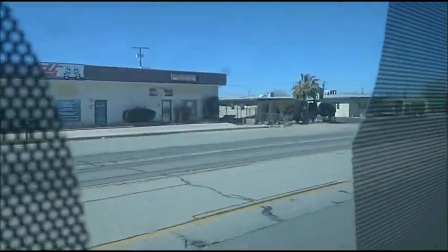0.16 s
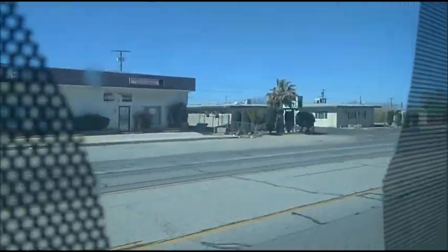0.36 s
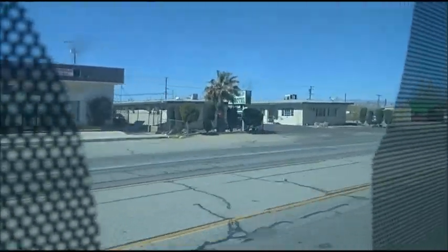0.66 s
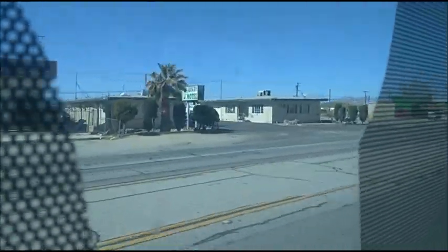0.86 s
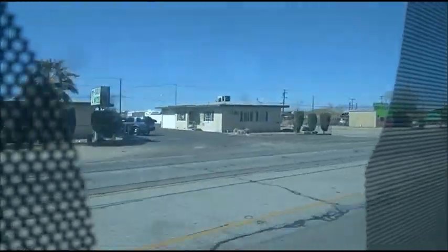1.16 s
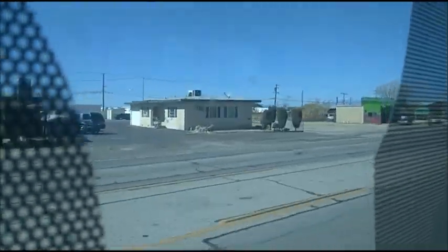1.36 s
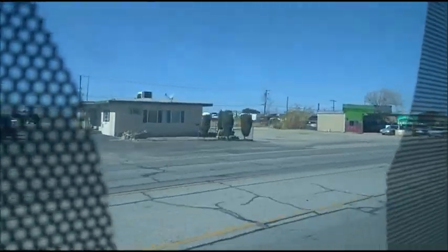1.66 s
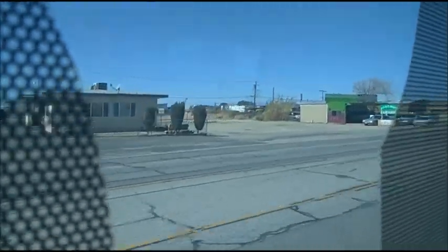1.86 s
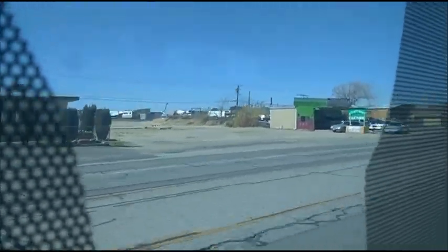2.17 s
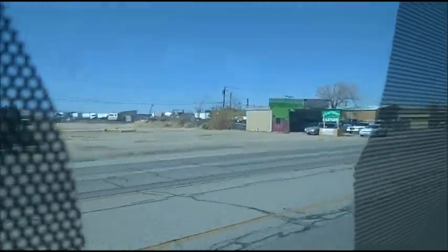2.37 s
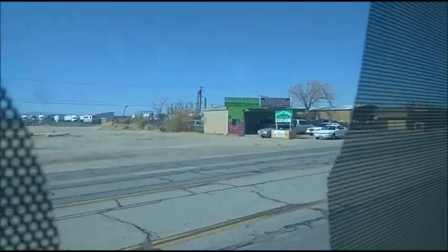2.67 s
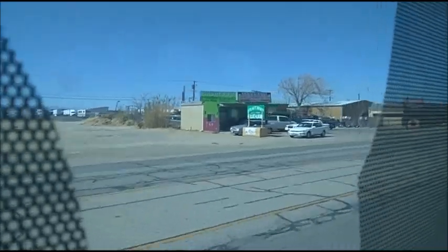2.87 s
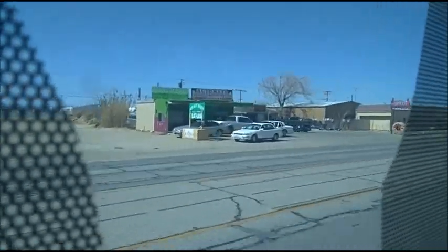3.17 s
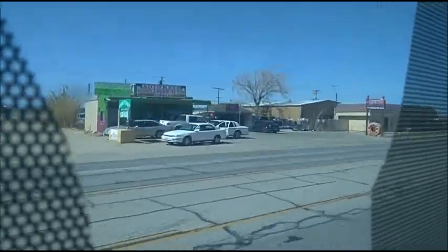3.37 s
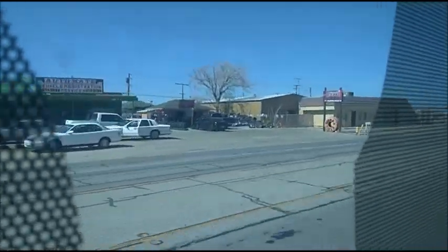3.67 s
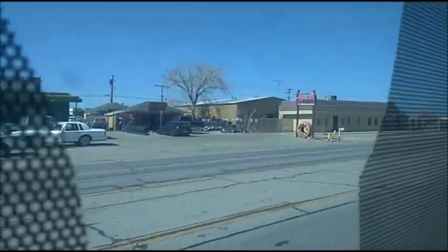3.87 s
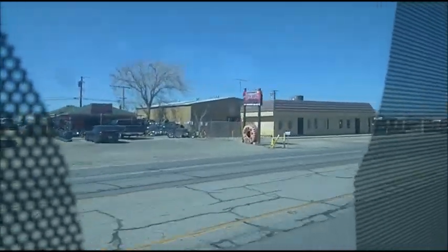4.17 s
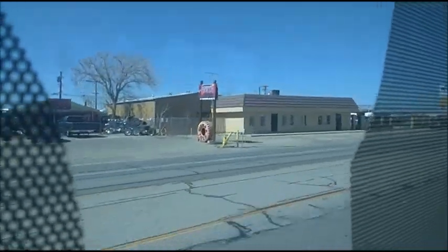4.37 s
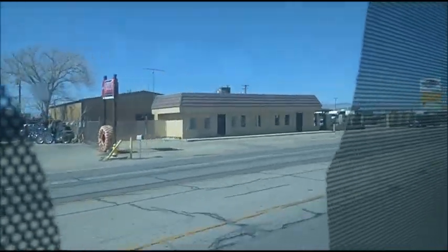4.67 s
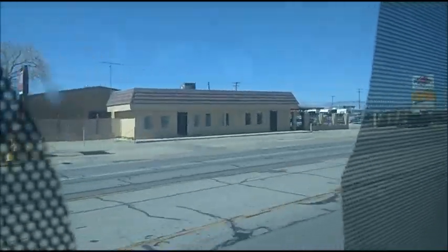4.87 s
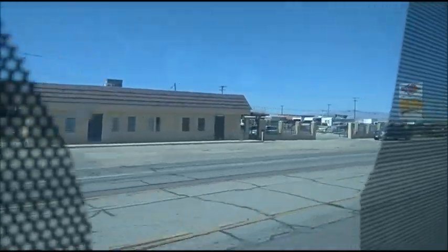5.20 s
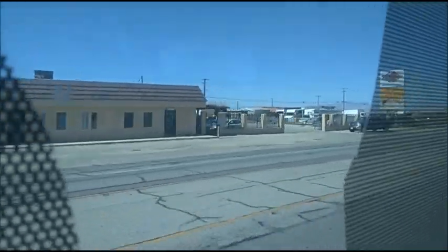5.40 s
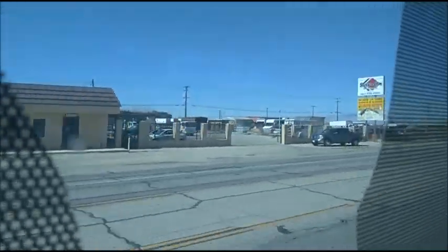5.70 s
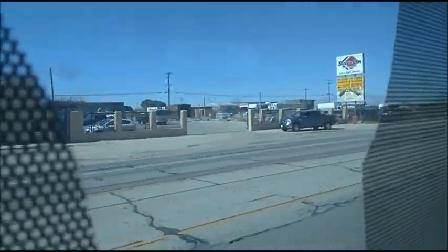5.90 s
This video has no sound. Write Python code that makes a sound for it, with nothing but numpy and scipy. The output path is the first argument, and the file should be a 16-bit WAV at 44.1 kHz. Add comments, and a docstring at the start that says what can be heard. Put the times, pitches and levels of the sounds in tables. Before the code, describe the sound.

The interior of an electric bus cruising along a cracked street for about six seconds, heard in stereo from close beside a side window. Continuous deep road boom and duller tyre roar dominate, fluttering gently, with little treble. Soft low thumps arrive irregularly, around five or six each second, as wheels cross cracks; heavier ones fall near 1.6, 2.1 and 3.9 seconds. A steady mid-pitched gear tone and fainter high motor whines rise very slightly throughout, wavering and swelling, the motor clearer near 1.5 and 5.25. A sharp plastic snap comes at 0.14. Tiny gritty trim creaks scatter along the left side, clearer around 3.9 and 4.4. A loose panel fizzes thinly from about 4.65 to 5. Another snap strikes at 5.66, then a quick double near 5.88 and a weaker one at 5.96, with the ride still rolling on.

```python
"""Inside an electric bus that cruises along a cracked street and gains a little speed, for about six seconds.
Throughout, coloured noise makes the road's boom and tyre roar, and short low tones thump at each crack.
Sine tones of gears and motor whine and slowly rise; gritty noise bursts make the trim creak.
A plastic panel snaps near the start, a loose one fizzes briefly after 4.6 s, and more snaps come near the end.
Two closely spaced microphones by a side window hear it all in stereo."""
import sys
import numpy as np
from scipy import signal
from scipy.fft import rfft, irfft
from scipy.io import wavfile
from scipy.ndimage import uniform_filter1d

SR = 44100
rng = np.random.default_rng(int(sys.argv[2]) if len(sys.argv) > 2 else 0)


def to_wav(s):
    """Save 16-bit WAV."""
    ch = np.atleast_2d(s).T  # columns
    pcm = np.round(np.clip(ch, -1, 1) * 32767)  # PCM
    wavfile.write(sys.argv[1], SR, pcm.astype(np.int16))


N = 266452  # length in samples

# Speed of the drive, as the pitch that all its tones are multiples of.
# Each row: time in seconds, pitch in Hz.
DRIVE_SPEED = [(0, 653.9), (1, 665), (2, 668.3), (3, 677.9), (4, 682.3), (5, 692.2), (6.04, 698.3)]
# Level of the treble, where the trim sizzles.
# Each row: time in seconds, relative level in dB.
TREBLE_LEVEL = [(0, -45), (.22, -53), (.62, -47.5), (.76, -52.5), (1.15, -50), (1.58, -50), (1.72, -54.5),
                (2.35, -53.5), (2.52, -51), (3.9, -50.5), (4.1, -53.5), (4.44, -49.5), (4.86, -44.5),
                (5.03, -49.5), (5.18, -54.5), (5.28, -49), (5.7, -49.5), (6.04, -47.5)]
# The wheels cross cracks in the road.
# Each row: middle in seconds, length in seconds, relative level of the body boom in dB, its pitch in Hz,
# relative level of the panel drone in dB, its pitch in Hz.
ROAD_CRACKS = [(0.128, 0.089, 10, 75, 5, 150.7), (.293, 0.12, 6, 68.1, 1, 123.3),
               (0.474, 0.049, 8, 68.1, -6, 121), (0.542, 0.044, 6.5, 68, -12, 122),
               (0.68, .058, 9.5, 67.8, 6.5, 201.8), (0.84, 0.054, 4, 67, 1.5, 194),
               (1.083, 0.044, 6, 63, 6, 154.9), (1.26, 0.065, 7, 70.24, 6, 160),
               (1.536, .05, 5.5, 70, 3, 156), (1.62, 0.06, 12.5, 69.6, 0, 149.5),
               (1.944, 0.044, -4, 67.35, 3, 204), (2.102, .05, 15, 68.04, 3.5, 196.4),
               (2.26, 0.042, 9.5, 68.8, -7, 197), (2.44, 0.075, 5, 73, -3, 201.6),
               (2.6, 0.049, 10.5, 68, 4, 214), (2.846, 0.038, 12, 82.3, 2.5, 121.2),
               (2.96, 0.07, 6.5, 72.2, 3, 106), (3.042, 0.047, 8.5, 66, 6.5, 199),
               (3.214, 0.05, 9.5, 68, 4.5, 122.8), (3.372, 0.062, 8.5, 69.9, -14, 228),
               (3.523, 0.037, 9, 77.4, 5, 145.3), (3.652, 0.051, 11, 73.1, 6.5, 198.6),
               (3.917, 0.05, 14.5, 70.86, 7.5, 105), (4.135, .037, 6.5, 67.3, -16, 190),
               (4.256, 0.063, 8, 72, 3, 150), (4.562, 0.049, 10, 65, -0.5, 197.8),
               (4.748, 0.079, 7.5, 72.9, 3, 148), (4.89, 0.044, 8, 65, 4, 161.3),
               (5.052, 0.1, 7.5, 69.2, 3.5, 202.2), (5.243, 0.039, 3, 73, 4, 195),
               (5.32, 0.055, 3, 76.2, 4.5, 163), (5.475, .035, 9.5, 67.6, 4, 105),
               (5.659, 0.017, 12.5, 75, -2, 104.8), (5.982, .071, -3, 79.5, -8, 146)]


def amp(db):
    """Turns decibels into a gain."""
    return 10 ** (np.asarray(db) / 20)


def evened(x):
    """Scales a signal to an average strength (rms) of 1."""
    return x / np.sqrt(np.mean(x ** 2) + 1e-20)


def over_time(rows):
    """Draws straight lines between the rows of a table, one value a sample."""
    return np.interp(np.arange(N) / SR, *np.transpose(rows))


def over_pitch(rows, hz):
    """Reads a table between its rows, along a logarithmic pitch axis."""
    f, value = np.transpose(rows)
    return np.interp(np.log(hz + 1), np.log(f + 1), value)


def wander(rate):
    """Slow random drift of rms 1, with changes up to about the given rate in Hz."""
    hz = np.fft.rfftfreq(N, 1 / SR)
    spectrum = rfft(rng.standard_normal(N))
    return evened(irfft(spectrum / (1 + (hz / rate) ** 4), N))


def at_ports(left, right):
    """Gives two spectra the differences in phase and level between the two microphones."""
    # Each row: pitch in Hz, phase in radians by which the left leads.
    left_lead = [(60, 0.5), (270, 1.3), (420, -0.4), (600, 0.2), (1350, 0.4), (1700, 2.6), (2200, 3.1),
                 (2900, 5.5), (3500, 6.8), (4000, 8.9), (4400, 9.5), (5300, 12.4), (6400, 15.6),
                 (8600, 21.9)]
    # Each row: pitch in Hz, left level minus right level in dB.
    left_balance = [(60, 0.5), (110, -0.5), (200, 4), (380, 4), (700, 1), (1280, 0.5), (2370, 2.5),
                    (4370, 2), (8070, 7), (14900, 15)]
    hz = np.fft.rfftfreq(N, 1 / SR)
    tilt = amp(over_pitch(left_balance, hz))
    delayed = right * np.exp(-1j * over_pitch(left_lead, hz))
    keep_power = np.sqrt(2 / (1 + tilt ** 2))
    return np.array([left * tilt, delayed]) * keep_power


def road(level_db=-26.5, lowest_hz=42, spill=2.4,
         boom_jolt=0.21, drone_jolt=0.51, roar_jolt=0.15, treble_jolt=0.11):
    """Noise coloured by the cabin, in five pitch bands that each follow a level curve and the jolts."""
    # Level of the road noise, which dips briefly after the big thumps.
    # Each row: time in seconds, relative level in dB.
    road_level = [(0, -40.5), (.22, -43), (.68, -39.5), (.76, -43), (1.12, -39.5), (1.6, -37),
                  (1.65, -46.5), (2.05, -43), (2.2, -43.5), (3.0, -40.5), (3.65, -39.5), (4.08, -44),
                  (4.5, -41), (4.82, -37), (5.14, -40), (5.64, -38), (5.72, -45), (5.88, -40.5)]
    # Colour of the road noise in the cabin. Each row: pitch in Hz, relative level in dB.
    road_colour = [(20, -37), (36, -16), (46, -20.5), (62, -2.5), (88, -5.5), (150, -10), (215, -9),
                   (310, -15.5), (500, -18), (730, -18.5), (860, -26.5), (1100, -28.5), (1600, -32.5),
                   (1900, -35), (2120, -41.5), (2350, -34.5), (3200, -40), (3700, -46), (4080, -44),
                   (4270, -53.5), (4450, -41.5), (4750, -43), (6200, -49.5), (8000, -50.5), (12000, -63),
                   (14200, -71.5)]
    # Cabin and tyre resonances. Each row: pitch in Hz, width in Hz, lift in dB.
    resonances = [(68, 8.1, 2.5), (150.3, 22, 4.5), (205, 25, 2.5), (583, 22, 3.5), (766, 25, 4.5),
                  (936, 48, 5.5), (1077, 110, 4), (2875, 100, 3.5), (3410, 190, 5)]
    # Likeness of left and right. Each row: pitch in Hz, likeness (1 alike, 0 or below unrelated).
    likeness = [(60, 0.8), (90, 0.77), (240, 0.58), (360, 0.06), (520, 0.63), (1120, 1), (1480, 0.07),
                (2050, 0.8), (2550, 1), (3250, 1), (3700, 0.5), (4150, 0.8), (7000, 0.5), (10000, -0.48)]

    hz = np.fft.rfftfreq(N, 1 / SR)
    a, b, c, d = rng.standard_normal((4, len(hz)))
    left = a + 1j * b
    same = np.clip(over_pitch(likeness, hz), 0, .99)
    right = same * left + np.sqrt(1 - same ** 2) * (c + 1j * d)
    colour_db = over_pitch(road_colour, hz)
    for f, width, lift_db in resonances:
        colour_db = colour_db + lift_db / (1 + (2 * (hz - f) / width) ** 2)
    rest = at_ports(left, right) * amp(colour_db)
    rest /= np.std(irfft(rest, N))

    boom, drone = jolts()
    # from low to high: (level, upper edge in Hz, smoothing in seconds)
    bands = [
        (swell(road_level, follow=0.48, jolt=boom_jolt * boom, flutter_db=1.0, flutter_hz=8.8), 88, .035),
        (swell(road_level, follow=0.63, jolt=drone_jolt * drone, flutter_db=0.97, flutter_hz=13.0), 290, .06),
        (swell(road_level, follow=0.91, jolt=roar_jolt * drone, flutter_db=.5, flutter_hz=6.2), 3400, .1),
        (swell(TREBLE_LEVEL, follow=1.0, jolt=treble_jolt * drone, flutter_db=2.1, flutter_hz=17), 9500, .1),
        (swell(TREBLE_LEVEL, follow=1.1, jolt=treble_jolt * drone, flutter_db=2.0, flutter_hz=16), 30000, .1)]
    out = np.zeros((2, len(hz)), complex)
    for level, top_hz, seconds in bands:
        band = rest / (1 + (hz / top_hz) ** 12)
        rest = rest - band
        moving = rfft(steadied(irfft(band, N), seconds) * level)
        # a heavy part cannot follow a jolt at once: limit the higher pitches that fast swells add
        out += moving / (1 + (hz / (spill * top_hz)) ** 8)
    low_cut = hz ** 3 / np.hypot(hz ** 3, lowest_hz ** 3)
    return amp(level_db) * irfft(out * low_cut, N)


def jolts():
    """Power that the cracks feed into body boom and panel drone: each swells and dies away."""
    power = np.zeros((2, N))
    for s, length, boom_db, _, drone_db, _ in ROAD_CRACKS:
        power += (amp([[boom_db], [drone_db]]) * bump_shape(s, length)) ** 2
    return power


def swell(level_curve, follow, jolt, flutter_db, flutter_hz):
    """Level of one band: steady noise that follows a level curve and flutters by chance, plus jolt power."""
    level_db = over_time(level_curve)
    steady_db = follow * (level_db - level_db.mean()) + flutter_db * wander(rate=flutter_hz)
    return evened(np.sqrt(amp(steady_db) ** 2 + jolt))


def steadied(x, seconds):
    """Evens out the chance swells of a noise by dividing by its own smoothed strength."""
    power = (x ** 2).mean(0)
    for _ in range(2):
        power = uniform_filter1d(power, max(int(seconds * SR), 2))
    return x * np.sqrt(power.mean() / (abs(power) + 1e-14))


def thumps(body_db=-37, panel_db=-37, waver_hz=4, skew_rad=0.47):
    """Each bump rings the body and one panel as two short, low tones with slightly wavering pitch."""
    t, out = np.arange(N) / SR, np.zeros((2, N))
    waver = np.cumsum(waver_hz * wander(rate=20.5)) / SR
    for s, length, boom_db, boom_hz, drone_db, drone_hz in ROAD_CRACKS:
        near = abs(t - s) < 2 * length
        shape = bump_shape(s, length)[near]
        for db, hz in ((body_db + boom_db, boom_hz), (panel_db + drone_db, drone_hz)):
            turns = hz * t[near] + waver[near] + rng.random()
            # a random phase on each side: every thump comes from a slightly different direction
            angle = 2 * np.pi * turns + skew_rad * rng.uniform(-1, 1, (2, 1))
            out[:, near] += amp(db) * shape * np.sqrt(2) * np.sin(angle)
    return irfft(at_ports(*rfft(out)), N)


def bump_shape(s, length, rise=0.68, fall=0.65, steepness=2.56):
    """Swell and decay of a bump, as shares of its length; steepness 2 is a soft bell, more is squarer."""
    t = np.arange(N) / SR - s
    width = length * np.where(t < 0, rise, fall)
    return np.exp(-.5 * np.minimum(abs(t / width) ** steepness, 60))


def drive(gear_db=0.0, motor_db=1, jitter_hz=1.42, gear_rough=0.11, motor_rough=0.18, motor_grit=0.19):
    """Gear and motor tones rise together with speed; road vibration roughens them."""
    # Level of the gear tones, which dips briefly after big thumps.
    # Each row: time in seconds, relative level in dB.
    gear_level = [(0, -37.5), (.2, -37), (.6, -32), (1.12, -37.5), (1.25, -35), (1.59, -34.5), (1.65, -43),
                  (2.2, -41.5), (2.6, -39), (3.0, -36.5), (3.62, -37.5), (4.05, -43), (4.85, -37),
                  (5.2, -42.5), (5.6, -35), (5.71, -49), (6.04, -43)]
    # Level of the motor tones. Each row: time in seconds, relative level in dB.
    motor_level = [(0, -59), (.3, -58.5), (.72, -61.5), (.82, -52), (1.0, -56), (1.25, -57.5), (1.56, -49),
                   (1.595, -51.5), (1.625, -65), (2.1, -69), (2.55, -59.5), (3.15, -62), (3.55, -57),
                   (3.95, -64.5), (4.25, -59.5), (4.75, -58), (5.02, -56.5), (5.25, -50), (5.5, -63),
                   (6.04, -63)]
    # Gear tones. Each row: multiple of the drive's pitch, relative level in dB, unsteadiness in dB,
    # share of the gear level's changes that it follows (0-1).
    gear_tones = [(.834, -15.5, 0.5, 0.4), (.998, -0.5, 0.94, 0.9), (1.878, -21.5, 1.5, 0.3),
                  (2.558, -17.5, 1.1, 0.04)]
    # Motor tones. Each row: multiple of the drive's pitch, relative level in dB, unsteadiness in dB,
    # share of the motor level's changes that it follows (0-1).
    motor_tones = [(3.908, -4.5, 2, 0.2), (4.801, -1.5, 1, 1), (7.077, -8.5, 3, 0), (8.351, -15.5, 1, 0.4),
                   (10.012, -13, 3, 0)]

    turns = np.cumsum(over_time(DRIVE_SPEED) + jitter_hz * wander(rate=11.7)) / SR
    gears = tones(gear_tones, turns, gear_level) * amp(gear_db)
    gears = gears * (1 + gear_rough * wander(rate=11))
    motor = tones(motor_tones, turns, motor_level) * amp(motor_db)
    motor = motor * (1 + motor_rough * wander(rate=17.0) + motor_grit * wander(rate=38))
    spectrum = rfft(gears + motor)
    return irfft(at_ports(spectrum, spectrum), N)


def tones(table, turns, level_curve):
    """Sines locked to the drive follow a level curve and swell as they glide through standing waves."""
    # Standing waves of the cabin. Each row: pitch in Hz, width in Hz, lift in dB.
    standing_waves = [(576, 4, 12), (1249.5, 3, 10), (1696.5, 11, 12), (1733, 18, 9), (1776, 14, 6),
                      (4713, 10, 5), (4785, 26, 3.5), (4909, 10, 7.5), (5660, 14, 6), (5805, 45, 5.5),
                      (6660, 22, 10), (6712, 10, 7), (6830, 40, 5), (6955, 70, 5)]
    curve_db, speed_hz = over_time(level_curve), over_time(DRIVE_SPEED)
    usual_db = curve_db.mean()
    out = np.zeros(N)
    for multiple, db, unsteady_db, share in table:
        level_db = usual_db + db + share * (curve_db - usual_db)
        for f, width, top_db in standing_waves:
            level_db = level_db + top_db / (1 + (2 * (multiple * speed_hz - f) / width) ** 2)
        level_db = level_db + unsteady_db * wander(rate=10.0)
        out += amp(level_db) * np.sqrt(2) * np.sin(2 * np.pi * (multiple * turns + rng.random()))
    return out


def trim(right_db=-3, shade_hz=6500):
    """A plastic panel snaps as the body twists, a little differently each time."""
    # Each row: start in seconds, left peak in dB, pitch as a multiple of the panel's own tones,
    # strength of the first crack (halved on the right).
    panel_snaps = [(.1399, -19, 1, .9), (5.6636, -17.5, .99, .9), (5.8765, -21.5, .98, .6),
                   (5.8786, -27.5, 1.01, .5), (5.959, -31, 1.04, 1.2)]
    out = np.zeros((2, N))
    for s, db, pitch, crack in panel_snaps:
        left = plastic_ring(pitch, crack)
        # the right microphone is shaded from the sharpest part of the crack
        right = signal.lfilter(*signal.butter(2, shade_hz, fs=SR), plastic_ring(pitch, crack / 2))
        snap = amp(db) * np.array([left, amp(right_db) * right])
        part = out[:, round(s * SR):][:, :snap.shape[1]]
        part += snap[:, :part.shape[1]]
    return out


def plastic_ring(pitch, crack, crack_t60=.009, scatter=.055, scatter_t60=.035):
    """One snap at one microphone: a bright crack, short ringing, and reflections from nearby glass."""
    # What the plastic rings with. Each row: pitch in Hz, relative level in dB,
    # time to fade by 60 dB in seconds.
    plastic_modes = [(2870, 0, 0.013), (3480, -2.5, 0.009), (4200, -3, 0.006), (4750, -3.5, 0.006),
                     (5900, -3, 0.006), (7000, -6, 0.006), (7750, -3, 0.008), (8550, -4, 0.007),
                     (9600, -13, .006), (13500, -13, 0.004)]
    # Colour of the first crack. Each row: pitch in Hz, relative level in dB.
    crack_colour = [(800, -16), (2200, -7), (2900, -2), (8000, -3), (10500, -14), (14500, -13)]
    t, hz = np.arange(2048) / SR, np.fft.rfftfreq(2048, 1 / SR)
    ring = np.zeros(len(t))
    for f, db, t60 in plastic_modes:
        ring += amp(db - 60 * t / t60) * np.sin(2 * np.pi * (pitch * f * t + rng.random()))
    burst = evened(irfft(rfft(rng.standard_normal(len(t))) * amp(over_pitch(crack_colour, hz))))
    ring = ring + crack * burst * amp(-60 * t / crack_t60)
    # sparse random echoes that die away, after the direct sound
    paths = scatter * rng.standard_normal(len(t)) * (rng.random(len(t)) < .15) * amp(-60 * t / scatter_t60)
    paths[0] = 1
    soft_start = 1 - np.exp(-t / 0.00066)
    ring = signal.fftconvolve(ring * soft_start, paths)
    return ring / abs(ring).max()


def near_creaks(level_db=1.0, centre_hz=7500, width_hz=2800, right_db=-8):
    """A joint close on the left gives the clearer creaks, each one a rub of gritty noise."""
    # Each row: middle in seconds, length in seconds (sound stops after 4096 samples), relative level in dB.
    clear_creaks = [(0.07, 0.046, -55), (0.312, 0.026, -56), (0.393, .045, -55), (.54, .03, -56),
                    (0.902, 0.051, -56), (1.145, 0.071, -53), (2.087, 0.085, -58), (2.202, 0.048, -56.5),
                    (2.723, 0.063, -58), (3.108, 0.037, -54), (3.801, 0.054, -53.5), (3.919, 0.064, -51),
                    (4.422, 0.067, -50.5), (4.578, 0.12, -54.5), (5.262, 0.073, -52), (5.77, 0.027, -59),
                    (5.974, 0.04, -52)]
    out = np.zeros((2, N))
    for s, length, db in clear_creaks:
        start = max(round((s - length / 2) * SR), 0)
        part = out[:, start:][:, :4096]
        part += amp(db + level_db) * rasp(centre_hz, width_hz, length)[:, :part.shape[1]]
    return out * np.array([[1], [amp(right_db)]])


def rasp(centre_hz, width_hz, length, slips_per_s=1500):
    """One brief rub of a joint: a gritty run of tiny slips that swells and stops."""
    t, hz = np.arange(4096) / SR, np.fft.rfftfreq(4096, 1 / SR)
    slips = rng.standard_normal((2, len(t))) * (rng.random(len(t)) < slips_per_s / SR)
    grit = irfft(rfft(slips) / (1 + (2 * (hz - centre_hz) / width_hz) ** 2))
    return evened(grit) * np.sin(np.pi * np.minimum(t / length, 1)) ** 2


def creaks(level_db=-7.5, per_s=0.74, spread_db=2, width_hz=1900, length=0.038, right_db=-7, count=16):
    """Joints of the trim rub faintly at random times, each at its own pitch, following the treble level."""
    out = np.zeros((2, N))
    for centre_hz in np.geomspace(5500, 10500, count):
        rub = rasp(centre_hz, width_hz, length * rng.uniform(0.8, 1.8))
        strength = amp(spread_db * np.minimum(rng.exponential(1, N), 2))
        starts = (rng.random(N) < per_s / SR) * strength
        rubs = signal.oaconvolve(starts[None], rub, axes=1)[:, :N]
        out += rubs / (1 + (centre_hz / 9000) ** 4)  # higher joints are fainter
    return out * amp(over_time(TREBLE_LEVEL) + level_db) * np.array([[1], [amp(right_db)]])


def buzz(centre_hz=11300, width_hz=2600, ticks_per_s=2500, right_db=-10):
    """A loose panel chatters so fast that its ticks merge into a thin fizz, mostly on the left."""
    # Each row: time in seconds, left level in dB.
    buzz_level = [(4.64, -83), (4.69, -53), (4.75, -62), (4.86, -62), (4.95, -74), (5.02, -77)]
    hz = np.fft.rfftfreq(N, 1 / SR)
    ticks = rng.standard_normal((2, N)) * (rng.random(N) < ticks_per_s / SR)
    fizz = evened(irfft(rfft(ticks) / (1 + (2 * (hz - centre_hz) / width_hz) ** 4), N))
    return fizz * amp(over_time(buzz_level)) * np.array([[1], [amp(right_db)]])


def scene():
    """Road noise, thumps, drive and trim together."""
    return road() + thumps() + drive() + trim() + creaks() + near_creaks() + buzz()


def record(dry, edge_hz=14500):
    """The recorder's band limit takes away what lies above its edge."""
    low_pass = signal.firwin(255, edge_hz, window=("kaiser", 8), fs=SR)
    return signal.oaconvolve(dry, low_pass[None], "same")


dry = scene()
out = record(dry)
to_wav(out)
```